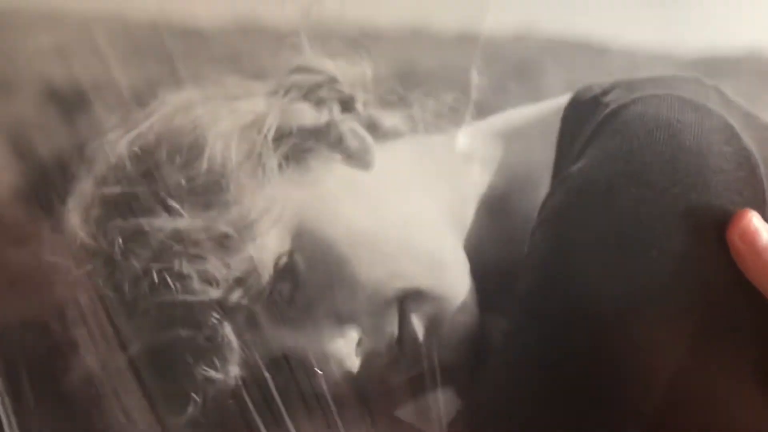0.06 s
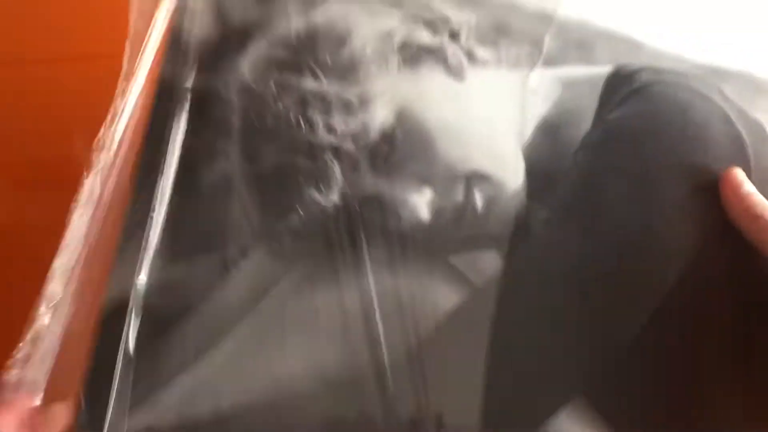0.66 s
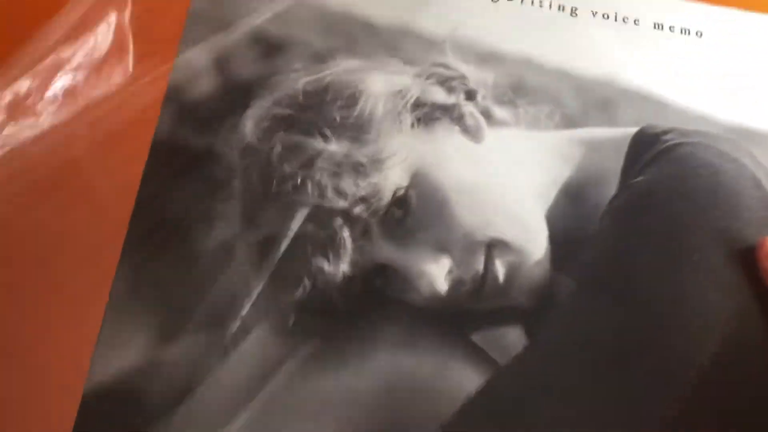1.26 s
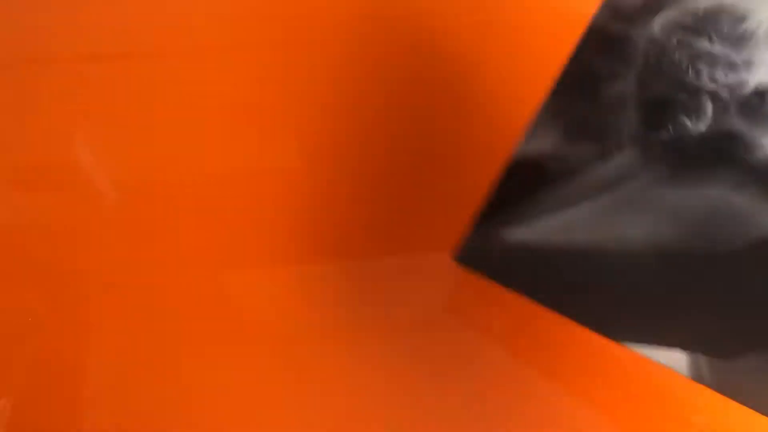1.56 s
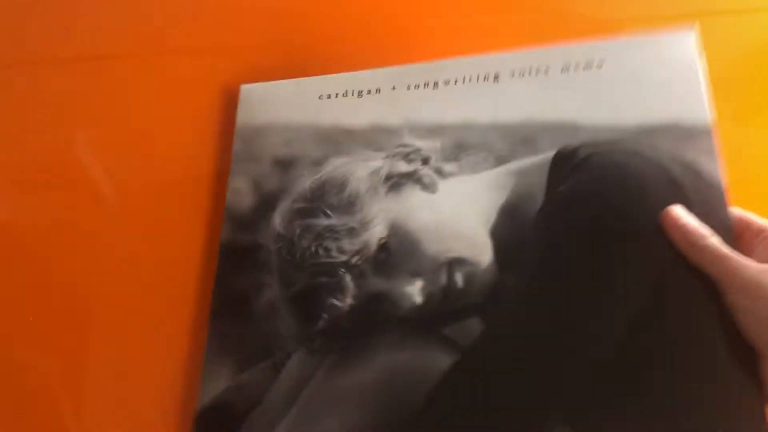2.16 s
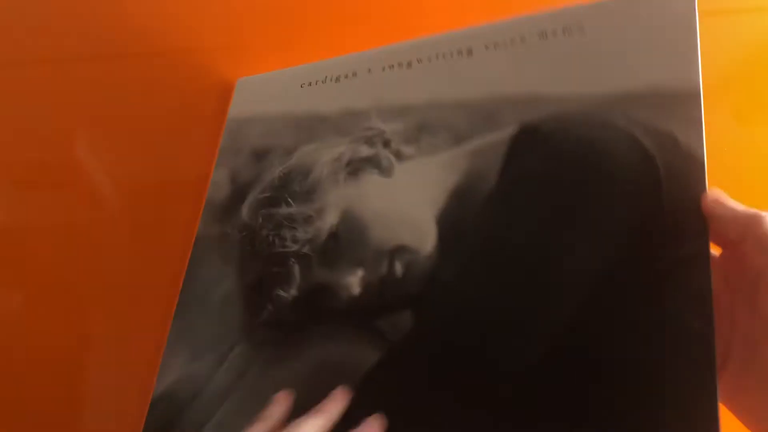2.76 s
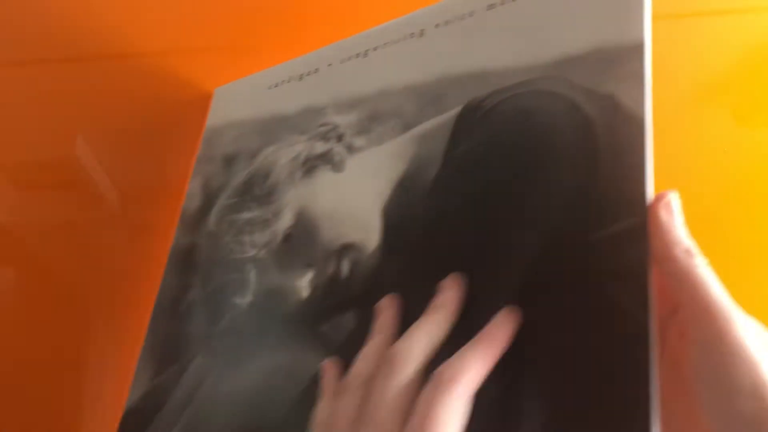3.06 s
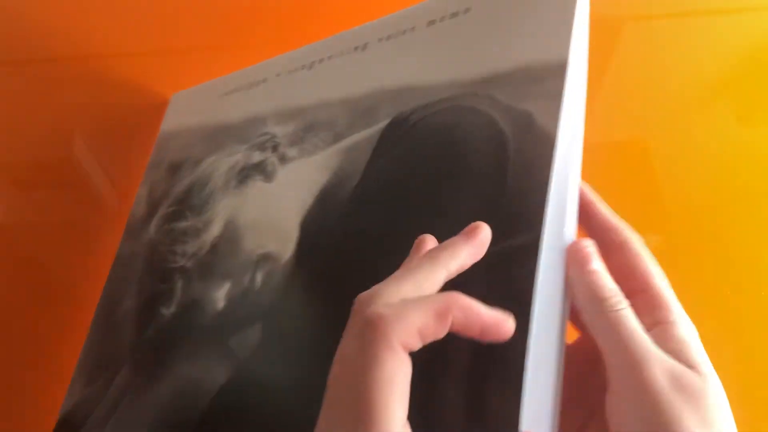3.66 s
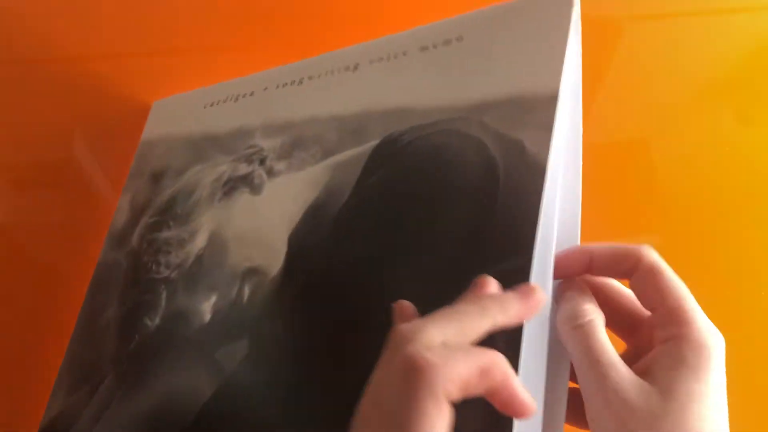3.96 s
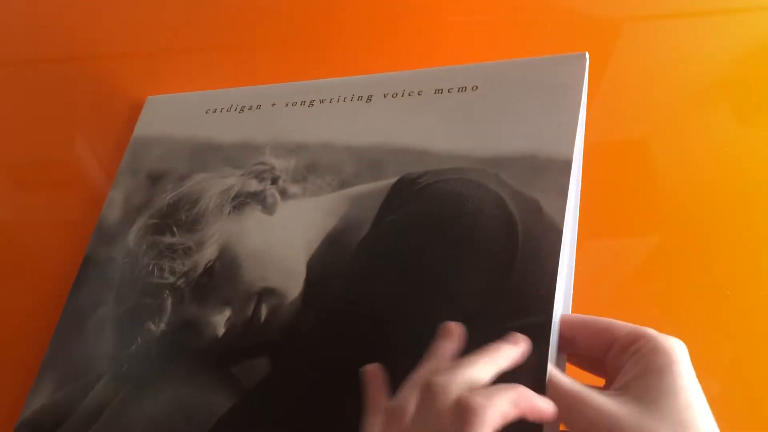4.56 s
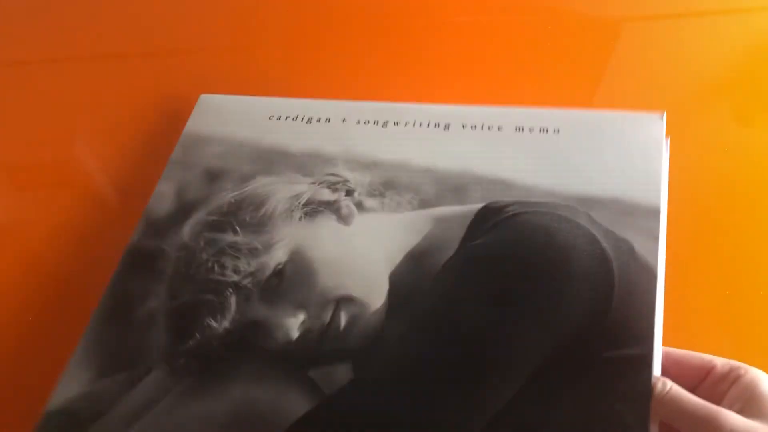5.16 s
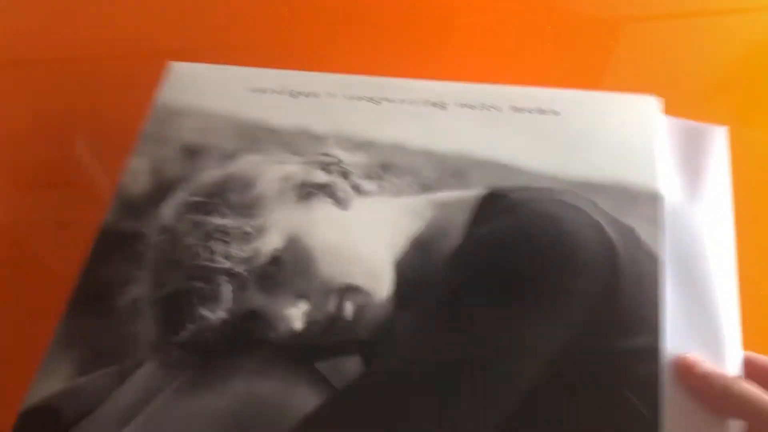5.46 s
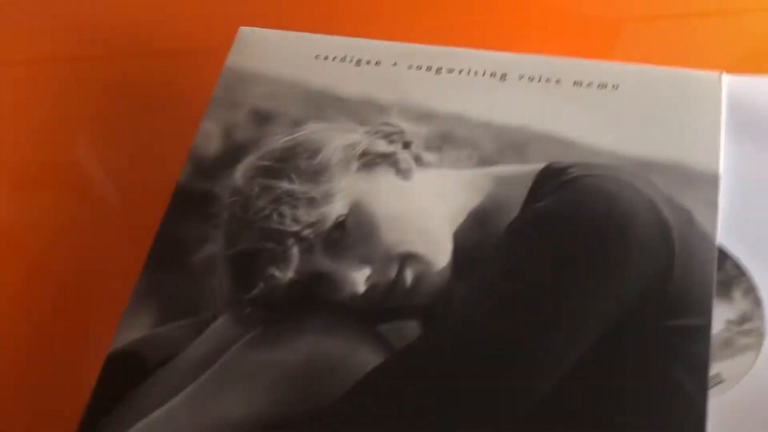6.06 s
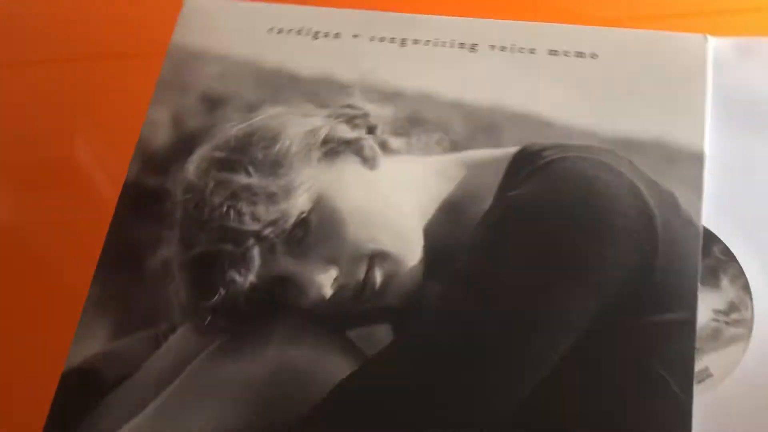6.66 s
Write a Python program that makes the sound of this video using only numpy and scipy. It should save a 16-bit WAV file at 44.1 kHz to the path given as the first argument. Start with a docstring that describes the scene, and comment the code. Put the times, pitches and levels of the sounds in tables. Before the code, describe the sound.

Thin plastic wrap crinkles and snaps off a record, fingers tap and rub the cardboard jacket, then a paper sleeve slides out.

```python
"""A record is unwrapped over a table in a small, quiet room.
First thin plastic wrap is dragged off the jacket: it hisses, crinkles, squeaks once and snaps free.
From about two seconds on, fingers turn, knock, rub and prise open the cardboard jacket.
Just after five seconds the paper inner sleeve slides out, and a few more knocks and rubs follow.
Every click runs through a bending sheet, so its treble arrives before its bass."""
import sys
import numpy as np
from scipy import signal
from scipy.fft import rfft, irfft, next_fast_len
from scipy.io import wavfile
from scipy.ndimage import map_coordinates

SR = 44100
rng = np.random.default_rng(int(sys.argv[2]) if len(sys.argv) > 2 else 0)


def store_pcm(level_fs):
    """Save levels as 16-bit WAV."""
    pcm = np.round(np.clip(level_fs, -1, 1) * 32767).astype(np.int16)
    wavfile.write(sys.argv[1], SR, np.atleast_2d(pcm).T)


N = 299880

# where the thump, body, crack and fizz of a snap or thud lie: f/Hz
SHEET_BANDS = [140, 500, 2700, 11000]
# pitches that the bare jacket lifts or swallows: f/Hz, width/Hz, lift/dB
JACKET_TONE = [(310, 84, -5), (517, 36, 6), (623, 50, 4), (1440, 300, -0.5)]


def wrap_drag():
    """Plastic wrap catches and slips on the card: it hisses, rustles, flutters and crinkles."""
    # tugs at the wrap, and flaps of its slack parts: start/s, length/s, level/dB
    tugs = [(0, 0.028, -57), (.09, .022, -47), (.14, 0.12, -67), (.362, .08, -56), (.465, .02, -46),
            (.54, .08, -46.5)]
    flaps = [(0, 0.038, -55.5), (.47, .012, -47.5), (.57, 0.048, -44.5), (.66, 0.077, -69),
             (.86, 0.074, -57.5), (1.18, .04, -44)]
    # the jacket glides out of the wrap: t/s, level/dB
    glide_levels = [(.64, -75), (.79, -61), (.87, -55.5), (1.0, -60), (1.27, -48), (1.4, -59.5),
                    (1.475, -55), (1.6, -61.5), (1.77, -56.5), (1.84, -67.5), (1.95, -59), (2.07, -59.5)]
    # tone colours of the sliding wrap, from high to low: f/Hz, level/dB
    hiss_colour = [(2500, -36), (5000, -1), (7000, -0.5), (10000, -2), (13000, -0.5), (15500, -3.5)]
    rustle_colour = [(450, -32.5), (900, -2), (1500, -2), (3000, -1.5), (4300, -2), (7000, -20.5)]
    flutter_colour = [(25, -41), (60, -6.5), (200, -5), (370, 1.5), (650, -1.5), (1300, -23)]
    tug = swells(tugs, attack_s=.028, release_s=.021)
    glide = level_curve(glide_levels)
    hiss = amp(1.5) * tug + glide  # a tug hisses more than a glide
    rustle = amp(-2) * (tug + glide)
    flutter = np.hypot(amp(-12) * (tug + glide), swells(flaps, attack_s=.031, release_s=.05))
    drag = hiss * friction(hiss_colour, 600, spread_db=5, grain=.26, uneven_db=1, travel_ms=.6)
    drag += rustle * friction(rustle_colour, 500, spread_db=3, grain=.3, uneven_db=1.5, travel_ms=1.5)
    drag += flutter * friction(flutter_colour, 170, spread_db=3, grain=.35, uneven_db=6, travel_ms=4.04)
    crinkle = friction(hiss_colour, 70, spread_db=4, grain=1, uneven_db=1, travel_ms=1)
    return drag + amp(-6) * hiss * crinkle


def wrap_snaps():
    """Tight wrap snaps free and the whole sheet thumps; single creases pop with little bass."""
    # snaps: t/s, level/dB, brightness/(dB per octave), travel time/ms, thump lift/dB
    snaps = [(.0427, -10, .3, 7.4, 16), (.1098, -1.5, 0, 4.66, 4.5), (.3535, -13.5, -2, 8, 11),
             (.4823, -15.5, -1, 7, 9.5), (.6233, 2, -3, 5, -1), (1.2286, 8.5, -0.47, 3.45, -3.5)]
    # crease pops: t/s, level/dB, brightness/(dB per octave), travel time/ms
    creases = [(.011, -26.5, -0.5, 1.15), (0.0766, -19.5, 1, 1.16), (0.1054, -16, 0.2, 2.36),
               (0.2114, -28.5, 1, 0.91), (0.341, -36.5, -1, 1.1), (0.41, -21.5, -1.5, 0.5),
               (.4677, -14.5, 1, 1.1), (0.5143, -20, 2.2, 1.06), (0.5243, -6.5, -2, 2),
               (0.607, -18, 3, 0.87), (.709, -21.5, -6.5, 4.3), (.7256, -24, 0.5, 1),
               (1.1629, -15.5, -5.5, 3), (1.6387, -28.5, 1, 1.04), (1.674, -24, 1.5, 2),
               (1.9706, -24.5, -.5, 1.05)]
    # their tone colours: level/dB at thump, body, crack and fizz
    snap_colour = [-2, -1.5, -0.5, -3]
    crease_colour = [-16.5, -2.5, 0, -2.5]
    # pitches that the tightly wrapped jacket lifts or swallows: f/Hz, width/Hz, lift/dB
    wrapped_tone = [(344, 28, 8), (404, 110, 4), (497, 46, 5.5), (820, 40, 0.5), (1024, 180, -9),
                    (2760, 280, -2), (4100, 650, -5.5)]
    rows = click_rows(snaps, snap_colour, SHEET_BANDS, half_scatter_ms=19)
    rows += click_rows([(*row, 0) for row in creases], crease_colour, SHEET_BANDS, half_scatter_ms=4)
    return clicks(rows, SHEET_BANDS, wrapped_tone, bass_hz=55.2, fast_hz=2895, scatter_s=.038)


def wrap_squeak(at_s=.67, width_s=.005, pitch_hz=1593, fall_hz_per_s=23000):
    """The wrap sticks and slips on the card for a few cycles, its pitch falling."""
    t = np.arange(N) / SR - at_s
    level = amp(-40.5) * np.exp(-(t / width_s) ** 2)
    return level * np.sin(2 * np.pi * t * (pitch_hz - fall_hz_per_s * t / 2))


def jacket_knocks():
    """Fingers knock on the card: nails sound bright, and the middle sounds hollower than the rim."""
    # knocks: t/s, level/dB, brightness/(dB per octave), travel time/ms, hollowness/dB
    knocks = [(2.0957, -1.5, 0.5, 3, 12), (2.1149, 2, -2.5, 3.43, 6), (2.1675, -2.5, 0.8, 3, 6),
              (2.2878, -7, 2, 0.59, -3), (2.4523, -28, 8.5, 1.1, 18), (2.6838, -22, -1, 4.3, 7),
              (3.019, -16, -0.5, 3, -3), (3.2214, -15, 0, 2.5, 1), (3.3979, -14, -0.5, 2.4, 6),
              (3.4138, -6, -1.5, 6.5, 2), (3.4203, -4, -0.5, 2.5, -19), (3.6769, 5.5, 0.1, 0.92, -14.5),
              (3.7709, -10, -2.5, 3.5, 2), (3.7937, -26.5, -3.5, 0.96, 15), (3.8072, -29, 8.5, 1.4, 0),
              (3.8621, -7.5, -4.5, 7, -11), (4.0308, -15, 1, 6, -3), (4.1285, -3.5, -2.5, 4, -10),
              (4.2755, -41, 8, 1, 0), (4.5348, -12, -6, 3.9, -6.5), (4.6804, -16, 1.5, 6.6, 2),
              (4.6841, -4, -3.5, 6, 0), (4.8895, -4, -1, 4, 6), (4.9115, 1, -1.5, 2, 2),
              (4.9483, 3.5, -3, 1.97, -9.5), (5.0269, -5, -2, 6.8, -4), (5.1644, -13.5, -3, 7.1, -9),
              (5.1972, -9, -0.5, 2, -8.5), (5.2357, -6.5, -3.5, 3.7, -18), (5.2977, -5.5, -2.5, 7, -19),
              (5.3702, -1, -4, 6.2, -4), (5.4404, -18.5, 8, 6.6, 6), (5.5782, -10, 4, 3, 14),
              (5.8589, -13, 0.5, 1.7, -4), (5.9925, -20.5, -1.5, 1.7, 8.5), (6.2398, -17, -0.5, 2.5, 0.5),
              (6.2832, -15, -.5, 1.16, -9), (6.5009, -17, 2.5, 4.9, 8.5), (6.6266, -31.5, -2, 3.5, 16.5),
              (6.7148, -15.5, 2.5, 2.04, 15.5), (6.7417, -24, 1.5, 1.47, 19)]
    # where the body, edge, crack and fizz of a knock lie: f/Hz
    bands = [480, 1450, 3700, 10500]
    # tone colour of a knock: level/dB in each of those bands
    colour = [0.5, -0.5, -9.5, -23.5]
    taps = click_rows([*knocks, *finger_touches()], colour, bands, half_scatter_ms=2.65)
    return clicks(taps + finger_judder(), bands, JACKET_TONE, bass_hz=206, fast_hz=6030, scatter_s=.053)


def finger_touches(start_s=2.7, end_s=5.3, per_s=3, travel_ms=2.5):
    """Rows of faint taps at random moments while the jacket is handled."""
    span_s = end_s - start_s
    return [(start_s + when * span_s, -23 + 6 * (2 * force - 1), 2 * hardness, travel_ms, 0)
            for when, force, hardness in rng.random((int(per_s * span_s), 3))]


def finger_judder(travel_ms=2.5, scattered=.45):
    """A fingertip sticks and slips: rows of small, uneven knocks."""
    # runs of slips: start/s, end/s, rate/Hz, level/dB
    runs = [(3.229, 3.32, 80, -8), (3.457, 3.507, 90, -6)]
    # tone colour of a slip: level/dB at body, edge, crack and fizz
    colour = [0.5, -19.5, -19, -36]
    rows = []
    for start, end, rate, db in runs:
        times = np.arange(start, end, 1 / rate)
        for s, (late, force) in zip(times, rng.standard_normal((len(times), 2))):
            levels = np.array(colour) + db + 1.5 * force
            rows.append((s + .15 * late / rate, *levels, travel_ms, scattered))
    return rows


def jacket_thuds(scattered=.3):
    """The broad card bows and pushes air: a soft thud with almost no treble."""
    # thuds: t/s, level/dB, travel time/ms
    thuds = [(2.117, 2, 3.99), (3.70, -9, 6), (3.745, -3.5, 6), (4.91, 2, 4.1), (4.933, 0.5, 3.2),
             (5.197, -6, 6.01), (5.581, 7, 5), (5.924, -5, 4.1)]
    # tone colour of a thud: level/dB at thump, body, crack and fizz
    colour = [0, -14.5, -38, -61.5]
    rows = [(s, *(np.array(colour) + db), travel_ms, scattered) for s, db, travel_ms in thuds]
    return clicks(rows, SHEET_BANDS, JACKET_TONE, bass_hz=56, fast_hz=5940, scatter_s=.057)


def jacket_rubs():
    """The card hisses and scrapes under rubbing fingers, and rumbles as it is bent."""
    # finger rubs: start/s, length/s, level/dB, hiss over scrape/dB
    rubs = [(2.134, 0.11, -51, -5.5), (2.76, 0.071, -58, -22), (2.89, 0.34, -72, 7),
            (3.264, .05, -57.5, -3.5), (3.478, 0.032, -58, -7), (3.601, 0.058, -59.5, 0.5),
            (3.66, 0.064, -54.5, -10), (3.804, 0.1, -60, -9), (4.022, 0.073, -60.5, -28),
            (4.115, 0.016, -52.5, -10), (4.19, .23, -63.5, -10.5), (4.449, 0.063, -53, -1.5),
            (4.54, 0.056, -57.5, -6.5), (4.664, 0.013, -53.5, -0.5), (4.735, 0.088, -64.5, -15),
            (4.918, 0.028, -48.5, -7), (5.206, 0.15, -58, -8), (6.279, 0.027, -61.5, -5.5),
            (6.38, 0.14, -64, -7), (6.707, .06, -58, -4)]
    # bends of the card, and the faint stir of the hands holding it: start/s, length/s, level/dB
    bends = [(2.14, 0.06, -54.5), (2.77, 0.064, -63), (3.0, 0.37, -67), (3.47, 0.022, -55),
             (3.69, 0.13, -58.5), (3.86, 0.036, -61), (4.08, 0.11, -59.5), (4.52, 0.053, -60.5),
             (4.69, 0.02, -62), (4.915, 0.015, -46), (4.99, 0.041, -56.5), (5.2, .05, -58.5),
             (5.53, 0.16, -57), (5.88, .12, -60), (6.27, 0.195, -59), (6.71, 0.089, -57.5)]
    holding = [(2.07, 3.9, -73)]
    # tone colours of the handled card, from high to low: f/Hz, level/dB
    hiss_colour = [(2800, -6), (5000, 3), (7000, -2), (10000, -5.5), (15500, -9.5)]
    scrape_colour = [(500, -7), (950, 2), (1400, 3), (2100, 1), (3000, -3.5), (4300, -10.5), (7000, -25.5)]
    flex_colour = [(20, -35), (60, 2), (130, 1), (300, -2), (520, -2.5), (780, -10), (1400, -36)]
    fades = dict(attack_s=.061, release_s=.049)
    hold = swells(holding, **fades)
    hiss_rows = [(s, length, db + lift) for s, length, db, lift in rubs]
    hiss = np.hypot(amp(-2) * hold, swells(hiss_rows, **fades))
    scrape = np.hypot(hold, swells([row[:3] for row in rubs], **fades))
    flex = np.hypot(hold, swells(bends, attack_s=.052, release_s=.083))
    rub = hiss * friction(hiss_colour, 500, spread_db=14, grain=.14, uneven_db=1.7, travel_ms=.88)
    rub += scrape * friction(scrape_colour, 240, spread_db=2, grain=.071, uneven_db=3, travel_ms=2.484)
    rub += flex * friction(flex_colour, 120, spread_db=4, grain=.29, uneven_db=6, travel_ms=2.984)
    return rub


def palm_sweep():
    """A palm brushes once over the cover with a soft swish."""
    # the sweep: t/s, level/dB
    levels = [(2.73, -60.5), (2.8, -63), (2.87, -59), (2.92, -53.5), (3.0, -53.5), (3.09, -57.5),
              (3.16, -65)]
    # tone colour of skin on card: f/Hz, level/dB
    colour = [(600, -26.5), (1300, -20.5), (1900, 1.5), (3000, 0), (4500, -1.5), (6000, -6), (10000, -7.5),
              (15500, -11)]
    swish = friction(colour, 2200, spread_db=10, grain=.2, uneven_db=1.5, travel_ms=2.3)
    return level_curve(levels) * swish


def sleeve_slide():
    """Paper slides over card: countless fibres slip in an even rush."""
    # the inner sleeve is drawn out: t/s, level/dB
    levels = [(5.28, -67), (5.355, -42), (5.4, -47), (5.43, -42), (5.58, -44), (5.752, -46.5), (5.775, -66),
              (5.81, -80)]
    # tone colour of paper on card: f/Hz, level/dB
    colour = [(150, -14), (300, -27.5), (700, -5), (950, 0), (1450, 4), (2000, 0), (2800, 2), (3600, -1.5),
              (5200, -1.5), (9000, -5.5), (11000, -9), (15600, -13.5)]
    rush = friction(colour, 4900, spread_db=8, grain=.14, uneven_db=.9, travel_ms=1.434)
    return level_curve(levels) * rush


def friction(colour, slips_per_s, spread_db, grain, uneven_db, travel_ms):
    """Smooth noise plus tiny slips under uneven pressure; grain is the slips' share of the power."""
    slips = (rng.random(N) < slips_per_s / SR) * rng.choice([-1, 1], N)
    sizes = amp(spread_db * np.minimum(rng.standard_normal(N), 2))
    force = np.sqrt(grain) * unit(slips * sizes) + np.sqrt(1 - grain) * rng.standard_normal(N)
    force *= amp(uneven_db * wobble(70))
    return unit(filtered(force, lambda hz: amp(along(colour, hz)) * bending(hz, travel_ms)))


def click_rows(events, colour, band_hz, half_scatter_ms, pivot_hz=1450):
    """Give each click its band levels; the further it travels, the more of it scatters."""
    octaves = np.log2(np.array(band_hz) / pivot_hz)
    lowest = np.array(band_hz) == min(band_hz)
    rows = []
    for s, db, brightness, travel_ms, lift in events:
        levels = np.array(colour) + db + brightness * octaves + lift * lowest
        scattered = travel_ms / (travel_ms + half_scatter_ms)
        rows.append((s, *levels, travel_ms, scattered))
    return rows


def clicks(rows, band_hz, tone, bass_hz, fast_hz, scatter_s, size=8192):
    """Each click: a brief lead-in, one direct chirp, then scattered echoes from the sheet's edges."""
    out, lead = np.zeros(N + 2 * size), size // 8
    hz, t = np.fft.rfftfreq(size, 1 / SR), np.arange(size // 2) / SR
    radiated = (1j * hz / (bass_hz + 1j * hz)) ** 2 * peaks_and_dips(tone, hz)  # sheets give little bass
    for s, *levels, travel_ms, scattered in rows:
        echoes = rng.standard_normal(len(t)) * amp(-60 * t / scatter_s) * (1 - np.exp(-t / .0006))
        force = np.sqrt(scattered) * echoes / np.linalg.norm(echoes)
        force[0] += np.sqrt(1 - scattered)  # the direct hit
        colour = amp(along(list(zip(band_hz, levels)), hz)) * smear(hz)
        creep = rng.standard_normal(lead) * np.exp(-t[:lead][::-1] / .00093)  # fibres give way first
        force = np.concatenate([amp(-9) * creep / np.linalg.norm(creep), force])
        click = irfft(rfft(force, size) * colour * radiated * bending(hz, travel_ms, fast_hz))
        out[round(s * SR):][:size] += click
    return out[lead:lead + N]


def bending(hz, travel_ms, fast_hz=6000):
    """Higher pitches cross a sheet faster, up to fast_hz; travel_ms is the trip's time at 1 kHz."""
    capped_hz = np.minimum(hz, fast_hz)
    cycles = travel_ms / np.sqrt(1000) * (2 * np.sqrt(capped_hz) - capped_hz / np.sqrt(fast_hz))
    return np.exp(-2j * np.pi * cycles)


def smear(hz, smear_ms=.43, bands=96):
    """A crease gives way piece by piece: each band of pitches leaves at its own instant."""
    jitter = np.interp(hz, np.linspace(0, SR / 2, bands), rng.standard_normal(bands))
    lag_ms = smear_ms * jitter * np.minimum(hz / 1500, 1)
    return np.exp(-2j * np.pi * np.cumsum(lag_ms) * hz[1] / 1000)


def peaks_and_dips(tone, hz):
    """A body lifts or swallows a few pitches."""
    return 1 + sum((amp(db) - 1) * 1j * hz * width / (centre ** 2 - hz ** 2 + 1j * hz * width)
                   for centre, width, db in tone)


def swells(rows, attack_s, release_s):
    """A gain where each row rises, holds and fades, by 20 dB per attack or release time."""
    t = np.arange(N) / SR
    power = np.zeros(N)
    for start, length, db in rows:
        fade = np.maximum((start - t) / attack_s, (t - start - length) / release_s)
        power += amp(db - 20 * np.clip(fade, 0, 10)) ** 2
    return np.sqrt(power)


def level_curve(points):
    """A gain that joins (t/s, level/dB) points and is silent outside them."""
    times, levels = np.transpose(points)
    return amp(np.interp(np.arange(N) / SR, times, levels, left=-120, right=-120))


def wobble(rate):
    """A smooth curve through rate random values a second."""
    return map_coordinates(rng.standard_normal(int(N * rate / SR) + 4), [np.arange(N) * rate / SR])


def filtered(x, response):
    """Shape each frequency of x by response(hz)."""
    size = next_fast_len(N + SR // 2)
    return irfft(rfft(x, size) * response(np.fft.rfftfreq(size, 1 / SR)), size)[:N]


def along(points, hz):
    """Read between (f/Hz, value) points on a log frequency scale."""
    freqs, values = np.transpose(points)
    return np.interp(np.log(hz + 1), np.log(freqs + 1), values)


def amp(db):
    """Turn decibels into a gain."""
    return 10 ** (np.asarray(db) / 20)


def unit(x):
    """Scale to an average power of 1."""
    return x / np.sqrt(np.mean(x ** 2) + 1e-20)


def room_echo(x, places=8):
    """Bare walls echo, and the echo changes as the record is moved about."""
    # how long the echo takes to fade by 60 dB: f/Hz, t/s
    fade_times = [(150, 0.49), (400, 0.43), (1000, 0.41), (3000, 0.45), (7000, 0.34), (15000, 0.18)]
    # tone colour of the echo: f/Hz, level/dB
    colour = [(60, -8), (200, -6.5), (550, -6.5), (1500, -5), (4000, -6.5), (9000, -7), (15000, -6)]
    # standing waves between the walls: f/Hz, width/Hz, lift/dB
    modes = [(134, 14, 8), (213, 16, 9), (316, 13, 2), (383, 15, 7)]
    echo = np.zeros(N)
    place = np.linspace(0, places - 1, N)
    for k in range(places):
        hz, t, noise = signal.stft(rng.standard_normal(SR * 3 // 4), SR, nperseg=256)
        fade_s = along(fade_times, hz)[:, None]
        envelope = amp(-60 * t / fade_s) / np.sqrt(fade_s) * (1 - np.exp(-t / .0018))
        tail = signal.istft(noise * envelope, SR, nperseg=256)[1]
        nearness = np.sqrt(np.maximum(1 - abs(place - k), 0))  # blends one place into the next
        echo += signal.fftconvolve(x * nearness, tail / np.linalg.norm(tail))[:N]
    return filtered(echo, lambda hz: amp(along(colour, hz)) * peaks_and_dips(modes, hz))


def room_air():
    """The faint, steady, low rush of a quiet room."""
    # its tone colour: f/Hz, level/dB
    colour = [(20, -28.5), (55, 0), (115, -4.5), (220, -1), (340, -8.5), (730, -10), (1200, -17.5),
              (2800, -19.5), (5000, -22), (15500, -31.5)]
    return amp(-66.5) * unit(filtered(rng.standard_normal(N), lambda hz: amp(along(colour, hz))))


def scene():
    """Wrap, jacket and sleeve at one close microphone, alike in both channels."""
    wrap = wrap_drag() + wrap_snaps() + wrap_squeak()
    jacket = jacket_rubs() + palm_sweep() + jacket_knocks() + jacket_thuds()
    direct = wrap + jacket + sleeve_slide()
    return np.tile(direct + room_air() + room_echo(direct), (2, 1))


def record(dry):
    """Cut away the very highest treble."""
    top_hz = 16300
    return np.array([filtered(side, lambda hz: hz < top_hz) for side in dry])


dry = scene()
out = record(dry)
store_pcm(out)
```